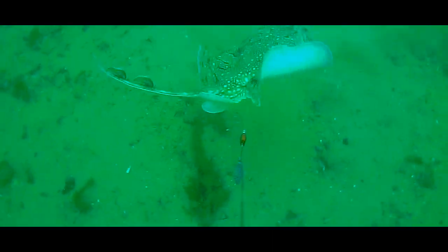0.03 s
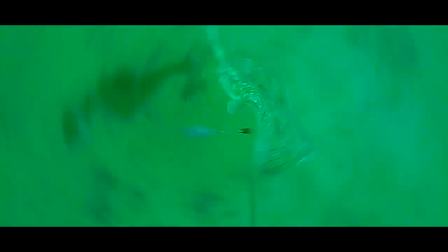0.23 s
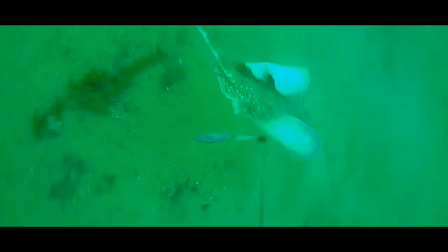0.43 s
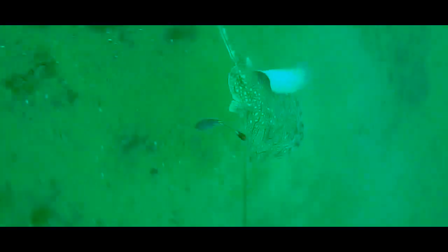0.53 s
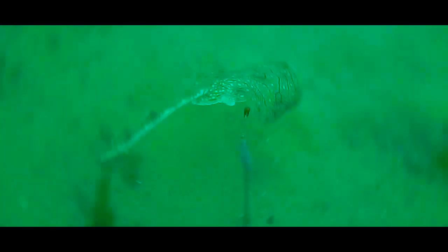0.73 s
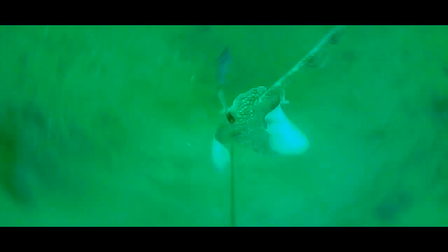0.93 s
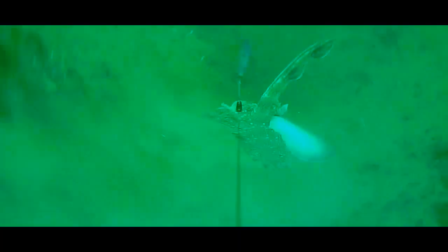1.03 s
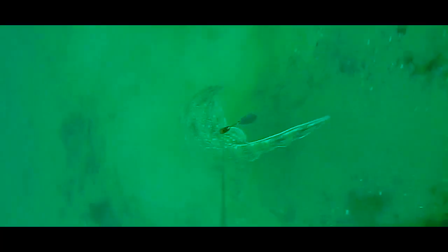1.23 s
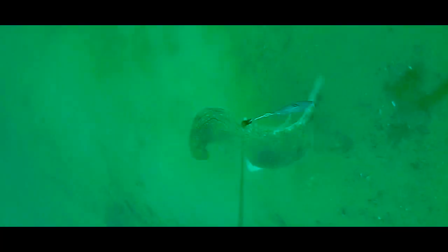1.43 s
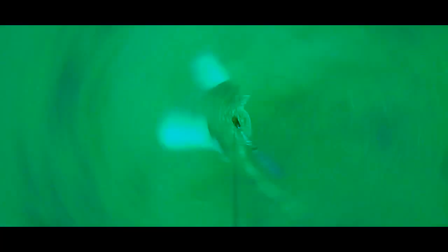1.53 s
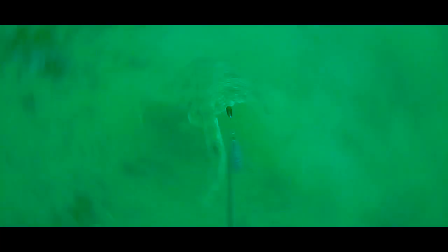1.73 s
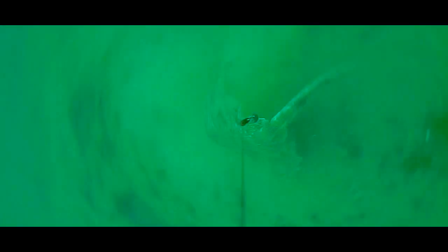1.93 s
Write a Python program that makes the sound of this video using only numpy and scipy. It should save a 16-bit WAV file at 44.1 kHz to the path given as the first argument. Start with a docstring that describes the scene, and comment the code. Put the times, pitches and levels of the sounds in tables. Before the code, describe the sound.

A strained fishing line whines and rasps underwater, climbing in pitch from 0.1 seconds, holding high around 0.5 and sliding down by 0.8. A second surge peaks at 1.0, and a faint one follows near 1.6. Tackle ticks against the camera housing, sharpest around 0.3 and 1.0, with softer knocks near 0.85 and 1.4. The line hums low and unevenly while water rumbles and faintly hisses throughout.

```python
"""A strained fishing line rubs in surges as it tows an underwater camera ahead of a spinning bait rig.
Its ribs excite a whine whose pitch follows the sliding speed, and friction adds a rasp; the resonances
of the camera housing filter both. The tackle ticks and knocks on the housing, the taut line hums low
in the current, and the passing water rumbles and hisses."""
import sys
import numpy as np
from scipy import signal
from scipy.fft import rfft, irfft
from scipy.io import wavfile
from scipy.ndimage import uniform_filter1d

SR = 44100
rng = np.random.default_rng(int(sys.argv[2]) if len(sys.argv) > 2 else 0)


def log_audio(samples):
    """Write samples as a 16-bit WAV file to the path given in sys.argv[1]."""
    # one column per channel
    frames = np.atleast_2d(samples).T
    # limit to full scale, then quantise
    limited = np.clip(frames, -1, 1)
    pcm = np.round(limited * 32767).astype(np.int16)
    wavfile.write(sys.argv[1], SR, pcm)


N = 88200

# Rate at which the ribs catch: time_s, pitch_hz
RIB_RATE = [(.11, 430), (.145, 580), (.175, 830), (.22, 985), (.26, 1190), (.285, 1110), (.315, 860),
            (.355, 1175), (.40, 1210), (.447, 1360), (.482, 1185), (.505, 1185), (.545, 1305), (.58, 1300),
            (.615, 1170), (.632, 1000), (.652, 790), (.68, 705), (.71, 572), (.765, 370), (.825, 150),
            (.855, 260), (.9, 478), (.95, 705), (.98, 860), (1.0, 885), (1.02, 810), (1.05, 540),
            (1.09, 220), (1.51, 500), (1.55, 680), (1.6, 770), (1.64, 650), (1.68, 420)]
# Strength of the rib excitation: time_s, level_db
WHINE_LEVEL = [(0, -80), (.12, -60), (.16, -48), (.19, -48), (.22, -41), (.26, -42), (.285, -46),
               (.315, -41), (.36, -36), (.415, -37), (.46, -32), (.5, -34), (.545, -28), (.6, -35),
               (.615, -37), (.627, -27), (.642, -41), (.66, -30), (.685, -27), (.73, -35), (.765, -36),
               (.82, -50), (.86, -41), (.93, -36), (.975, -32), (1.003, -22), (1.02, -34), (1.055, -36),
               (1.09, -62), (1.5, -70), (1.56, -48), (1.62, -47), (1.68, -68), (2, -80)]
# Harmonics of the whine, fundamental first: level_db
HARMONICS_DB = [-6, 0, -6, -4, -14, -14, -19]
# Housing response to the whine: frequency_hz, gain_db
WHINE_COLOUR = [(100, -24), (450, -15), (700, -16), (900, -17), (1050, -14), (1150, -6), (1230, 0),
                (1450, 1), (1750, 0), (2070, 0), (2330, -10), (2600, -24), (3000, -19), (3600, -17),
                (4200, -21), (4900, -16), (5650, -21), (6600, -35), (9000, -44)]
# Strength of the friction noise: time_s, level_db
RASP_LEVEL = [(0, -62), (.1, -61), (.15, -47.5), (.22, -45.5), (.33, -43), (.45, -41.5), (.57, -38),
              (.62, -33), (.69, -32), (.76, -39.5), (.82, -46.5), (.9, -36.5), (.97, -36), (1.02, -34),
              (1.055, -32), (1.085, -49.5), (1.16, -41.5), (1.25, -45.5), (1.295, -39.5), (1.35, -56),
              (1.45, -60), (1.5, -55), (1.55, -43.5), (1.62, -43.5), (1.67, -54.5), (1.73, -47.5),
              (1.8, -52.5), (1.88, -48), (2, -61.5)]
# Housing response to friction: frequency_hz, gain_db
RASP_COLOUR = [(100, -2), (300, -38.5), (520, -30.5), (750, -31.5), (980, -44.5), (1220, -2), (1450, 1),
               (1750, -2), (2070, 7), (2280, -3.5), (2600, -25), (3000, -12.5), (3500, -12.5),
               (4200, -14.5), (5000, -7.5), (5650, -14.5), (6600, -34), (7600, -21.5), (9000, -70)]
# Groan under load, relative to the scrape: time_s, gain_db
GROAN_GAIN = [(0, -11.5), (.55, -23.5), (.7, -17), (.86, -7.5), (.97, -28.5), (1.05, -10), (1.3, -15),
              (1.6, -9), (2, -15)]
# Hard contacts of the tackle: start_s, level_db
TICKS = [(.2732, -15.5), (.3039, -12.5), (.3934, -18), (.4044, -23), (.4318, -19), (.4865, -22.5),
         (.5397, -27), (.596, -20.5), (.6243, -23.5), (.9651, -10), (1.0412, -13), (1.136, -39),
         (1.2925, -30.5), (1.5722, -23.5)]
# Resonances of a tick: frequency_hz, gain_db
TICK_COLOUR = [(100, -18.5), (900, -28), (1250, -6.5), (1700, -8), (2060, 4.5), (2350, -9.5), (2750, -15),
               (3450, -6.5), (4100, -15), (5000, -4), (5800, -13.5), (6700, -24.5), (7600, -19),
               (9000, -71)]
# Softer blows: start_s, level_db, thump_hz, thump_db, thump_t60_s, rebound_delay_s
KNOCKS = [(0.8434, -23.5, 205.2, -18.5, 0.04, 0.002), (1.4161, -25, 158.9, -30, 0.2, 0.004)]
# Resonances of a knock: frequency_hz, gain_db
KNOCK_COLOUR = [(100, -27.5), (330, -2), (600, -32.5), (950, -29), (1380, -3), (1620, -7.5), (1800, -2.5),
                (1920, -0.5), (2070, 6.5), (2230, -2), (2600, -24), (3300, -14.5), (5000, -24), (6500, -60),
                (7500, -19.5), (9000, -84.5)]
# Vibration of the taut line: time_s, pitch_hz, level_db
HUM = [(0, 159.4, -69), (.23, 167.9, -65.5), (.27, 171.5, -67), (.38, 168.3, -60), (.45, 172.4, -53.5),
       (.5, 176.6, -83), (.61, 180.1, -65), (.66, 190.8, -48), (.8, 173.6, -49), (.95, 150.2, -55.5),
       (1.0, 161.2, -43.5), (1.03, 176.7, -36.5), (1.06, 207.4, -46.5), (1.09, 174, -41.5),
       (1.15, 169, -38.5), (1.21, 175.5, -49), (1.32, 180, -81.5), (1.5, 172.5, -53.5), (1.6, 224.5, -47),
       (1.645, 175, -55), (1.69, 158, -43), (1.745, 181.8, -38.5), (1.77, 184.2, -39), (1.8, 188.1, -89),
       (1.88, 220.6, -52), (1.93, 206, -86), (2, 159, -51)]
# Strength of the buffeting flow: time_s, level_db
RUMBLE_LEVEL = [(0, -62), (.04, -57), (.07, -45), (.14, -46), (.2, -55), (.32, -55), (.45, -49), (.53, -53),
                (.7, -52), (.8, -54), (.89, -46), (.97, -54), (1.12, -48), (1.31, -49), (1.37, -59),
                (1.45, -51), (1.55, -56), (1.62, -50), (1.7, -54), (1.77, -49), (1.87, -53), (2, -57)]
# Spectrum of the rumble: frequency_hz, gain_db
RUMBLE_COLOUR = [(8, -7.5), (18, 0), (35, -8.5), (60, -25.5), (100, -30), (200, -32.5), (500, -55.5)]
# Strength of the water's hiss: time_s, level_db
HISS_LEVEL = [(0, -62.5), (.1, -60.5), (.2, -60), (1.2, -57.5), (1.45, -59.5), (1.7, -59), (2, -57)]
# Spectrum of the hiss: frequency_hz, gain_db
HISS_COLOUR = [(60, -3), (200, 14), (330, 3.5), (900, -3.5), (1400, -23), (2050, -18), (2600, 1), (3500, 1),
               (5000, -9), (6600, -1.5), (8000, -14)]

PITCH_JITTER, SHIMMER_DB, OVERTONE_BLUR_RAD = .011, 2, .15
SLIPS_PER_S, SLIP_SPREAD_DB, RASP_FLICKER_DB = 1300, 1, 1.5
REBOUND_GAIN_DB, THUMP_RISE_S = 4.5, .0047
HUM_WANDER, HUM_FLUTTER_DB, HUM_NOISE_DB = .025, 2, -14
HISS_SWELL_DB = 1
SMEAR_HZ, SMEAR_WIDTH_HZ, CUTOFF_HZ = 4200, 6600, 7950


def whine():
    """Periodic excitation: ribs catch at a slightly uneven rate, giving a gliding harmonic series."""
    pitch_hz = uniform_filter1d(curve(RIB_RATE), size=500) * (1 + PITCH_JITTER * wander(hz=300))
    phase = 2 * np.pi * np.cumsum(pitch_hz) / SR
    harmonics = 0
    for k, level_db in enumerate(HARMONICS_DB):
        blur = OVERTONE_BLUR_RAD * max(k - 1, 0) * wander(hz=201)  # roughens the third harmonic and up
        amplitude = undb(level_db + SHIMMER_DB * wander(hz=83))
        harmonics += amplitude * np.sin((k + 1) * phase + blur)
    return colour(np.sqrt(2) * harmonics * undb(curve(WHINE_LEVEL)), WHINE_COLOUR)


def rasp():
    """Stick-slip friction: dense tiny slips excite the housing, with a low groan under load."""
    slips = (rng.random(N) < SLIPS_PER_S / SR) * rng.choice([-1, 1], N)
    slip_sizes = undb(SLIP_SPREAD_DB * np.minimum(rng.exponential(size=N), 4))
    friction = unit(slips * slip_sizes) + rng.standard_normal(N)
    scrape = unit(colour(friction, RASP_COLOUR))
    groan = noise_band(hz=384, width_hz=640) * undb(curve(GROAN_GAIN))
    return (scrape + groan) * undb(curve(RASP_LEVEL) + RASP_FLICKER_DB * wander(hz=46.5))


def ticks():
    """Impulse excitation: brief, hard contacts of the tackle ring the housing brightly."""
    return strike(TICKS, TICK_COLOUR)


def knocks():
    """Impact and rebound: each softer blow hits the housing twice and plucks the line."""
    out = np.zeros(N)
    for start_s, level_db, thump_hz, thump_db, t60_s, delay_s in KNOCKS:
        contacts = [(start_s, level_db), (start_s + delay_s, level_db + REBOUND_GAIN_DB)]
        out += strike(contacts, KNOCK_COLOUR) + undb(thump_db) * thump(start_s, thump_hz, t60_s)
    return out


def strike(contacts, spectrum):
    """Dispersion: the housing delays some frequencies more than others, smearing each ringing contact."""
    impulses = np.zeros(N)
    for start_s, level_db in contacts:
        impulses[int(start_s * SR)] += undb(level_db)
    b, a = signal.iirpeak(SMEAR_HZ, SMEAR_HZ / SMEAR_WIDTH_HZ, fs=SR)
    smeared = impulses - 2 * signal.lfilter(b, a, impulses)  # all-pass: only the phase changes
    return colour(smeared, spectrum) / np.abs(impulse_response(spectrum)).max()


def thump(start_s, hz, t60_s):
    """Damped oscillation: one mode of the plucked line rises softly and decays exponentially."""
    age_s = np.maximum(np.arange(N) / SR - start_s, 0)
    rise = 1 - np.exp(-age_s / THUMP_RISE_S)
    decay = np.exp(-np.log(1000) * age_s / t60_s)
    return np.sin(2 * np.pi * hz * age_s) * decay * rise


def hum():
    """Flow-induced vibration: the current strums the taut line, which wavers in pitch and strength."""
    pitch_hz = curve(HUM) * (1 + HUM_WANDER * wander(hz=37))
    tone = np.sqrt(2) * np.sin(2 * np.pi * np.cumsum(pitch_hz) / SR)
    noise = undb(HUM_NOISE_DB) * noise_band(hz=221.4, width_hz=32.4)
    return (tone + noise) * undb(curve(HUM, column=2) + HUM_FLUTTER_DB * wander(hz=27))


def water():
    """Flow noise: water buffets the housing, giving a deep surging rumble and a faint hiss."""
    rumble = unit(colour(rng.standard_normal(N), RUMBLE_COLOUR))
    hiss = unit(colour(rng.standard_normal(N), HISS_COLOUR))
    hiss_db = curve(HISS_LEVEL) + HISS_SWELL_DB * wander(hz=1.33)
    return rumble * undb(curve(RUMBLE_LEVEL)) + hiss * undb(hiss_db)


def undb(db):
    """Amplitude ratio of a level in decibels."""
    return 10 ** (np.asarray(db) / 20)


def unit(x):
    """Normalisation to rms 1."""
    return x / np.sqrt(np.mean(x ** 2))


def curve(rows, column=1):
    """Linear interpolation of a table column over time."""
    rows = np.array(rows, float)
    return np.interp(np.arange(N) / SR, rows[:, 0], rows[:, column])


def wander(hz):
    """Random modulation: low-passed noise of rms 1."""
    lowpass = signal.butter(2, hz, fs=SR, output="sos")
    return unit(signal.sosfilt(lowpass, rng.standard_normal(2 * N))[N:])


def noise_band(hz, width_hz):
    """Resonant filtering: noise passed twice through one resonator, at rms 1."""
    b, a = signal.iirpeak(hz, hz / width_hz, fs=SR)
    return unit(signal.lfilter(b, a, signal.lfilter(b, a, rng.standard_normal(N))))


def impulse_response(spectrum, size=8192):
    """Minimum phase: folding the cepstrum gives a causal response with the given spectrum."""
    hz, db = np.array(spectrum, float).T
    bins_hz = np.maximum(np.fft.rfftfreq(size, 1 / SR), 1)
    gain = undb(np.interp(np.log(bins_hz), np.log(hz), db))
    cepstrum = irfft(np.log(gain))
    cepstrum[1:size // 2] *= 2
    cepstrum[size // 2 + 1:] = 0
    return irfft(np.exp(rfft(cepstrum)))


def colour(x, spectrum):
    """Linear filtering: convolution imposes a spectrum on a sound."""
    return signal.fftconvolve(x, impulse_response(spectrum))[:N]


def scene():
    """Superposition: all sources add at one microphone inside the housing."""
    return (whine() + rasp() + ticks() + knocks() + hum() + water())[None]


def record(dry):
    """Band limiting: the camera cuts the treble steeply."""
    return signal.sosfilt(signal.ellip(10, .2, 70, CUTOFF_HZ, fs=SR, output="sos"), dry)


dry = scene()
out = record(dry)
log_audio(out)
```